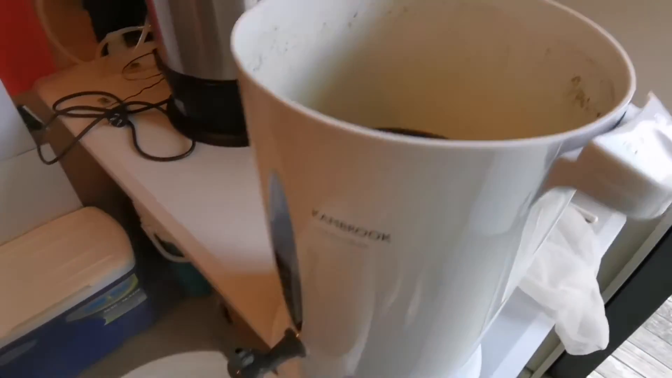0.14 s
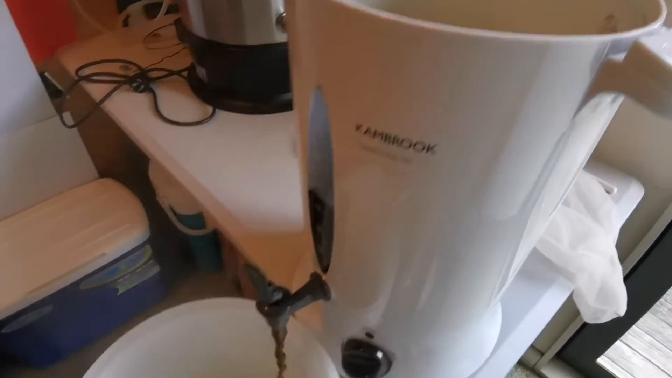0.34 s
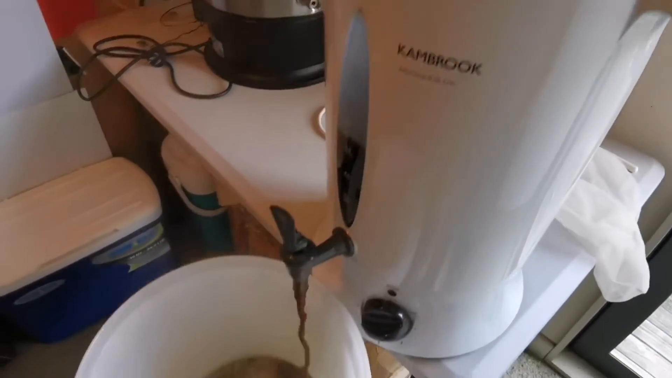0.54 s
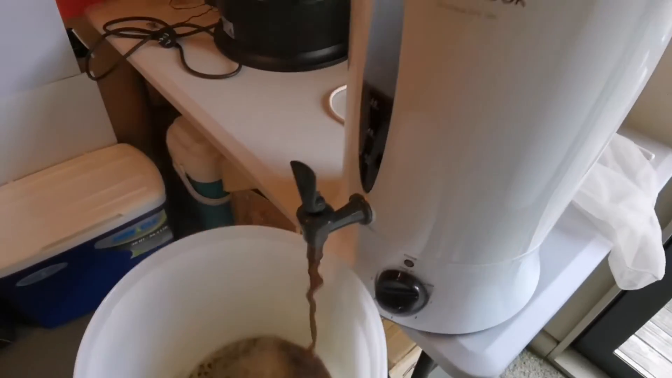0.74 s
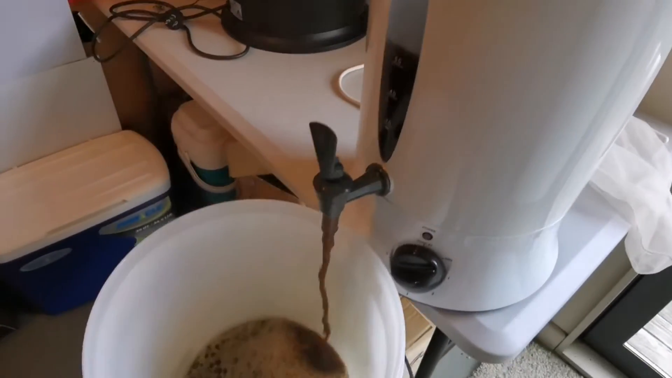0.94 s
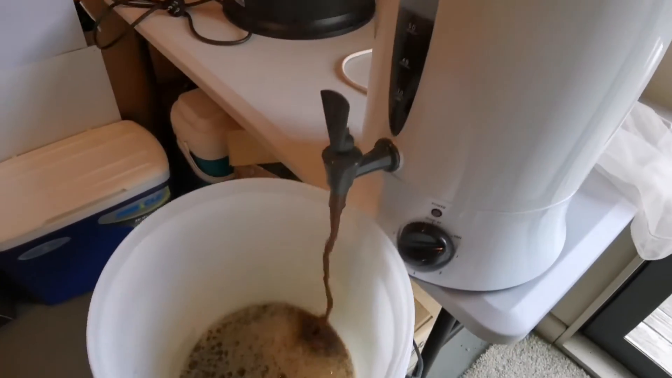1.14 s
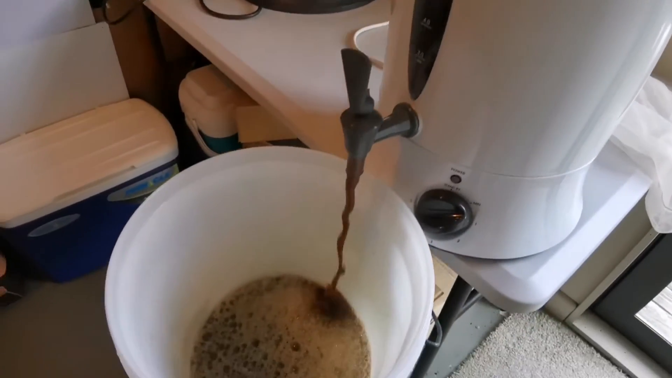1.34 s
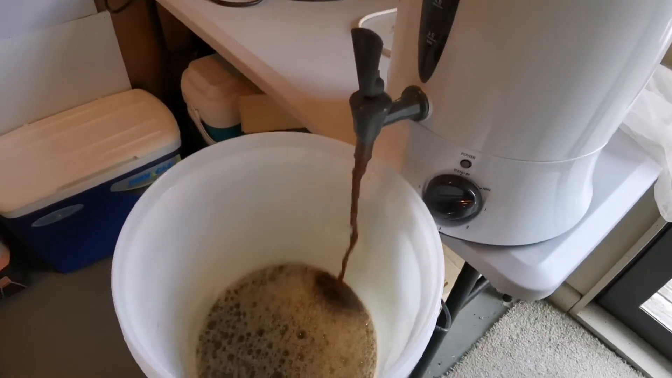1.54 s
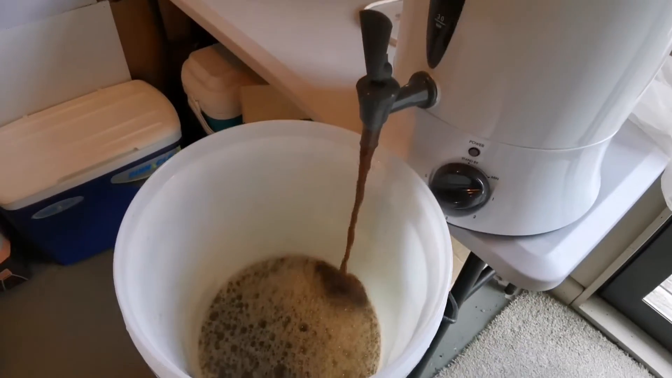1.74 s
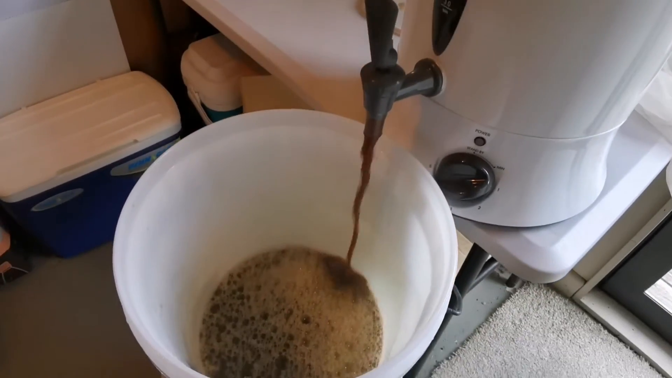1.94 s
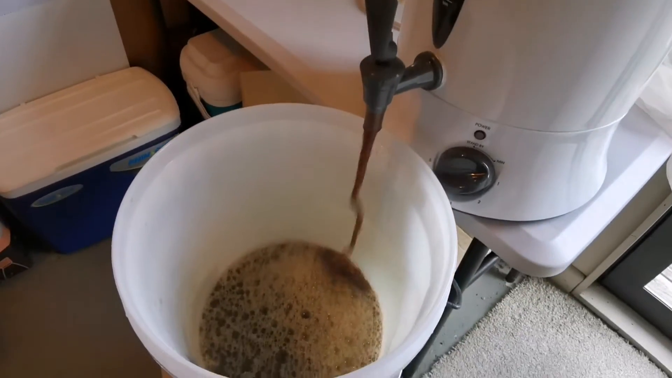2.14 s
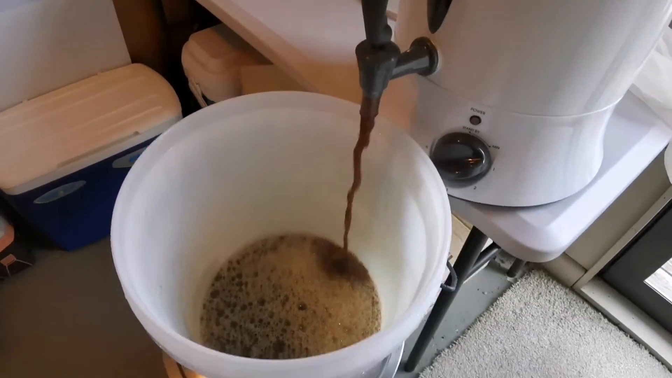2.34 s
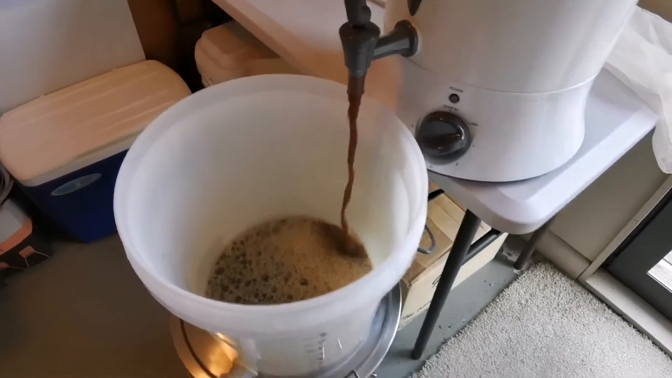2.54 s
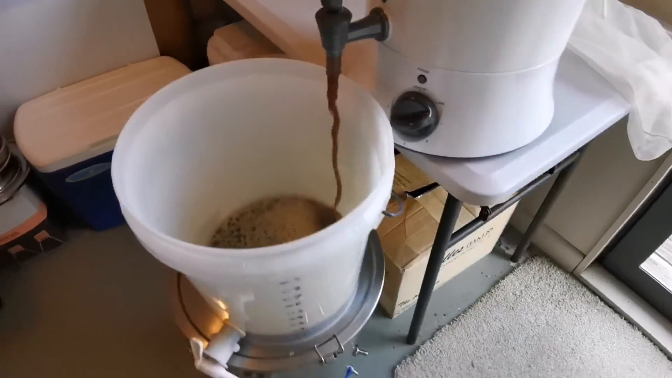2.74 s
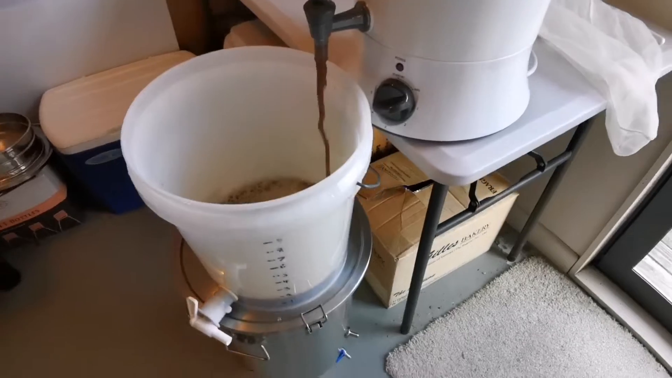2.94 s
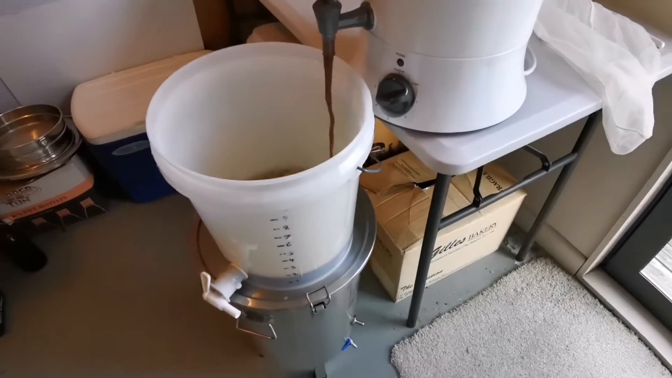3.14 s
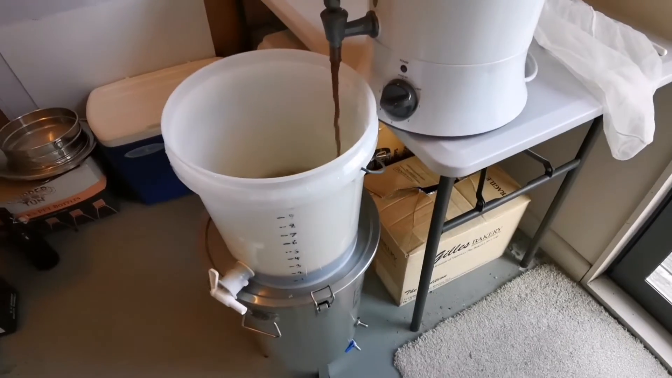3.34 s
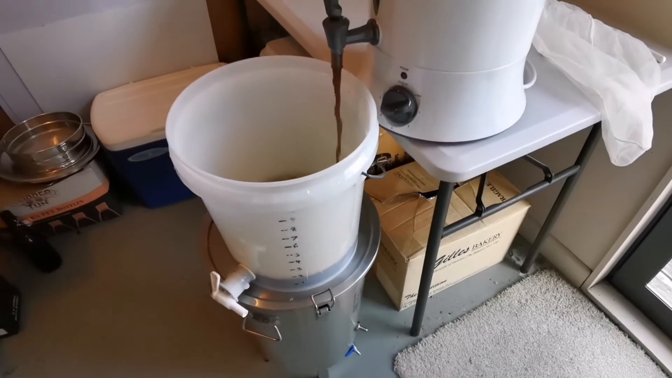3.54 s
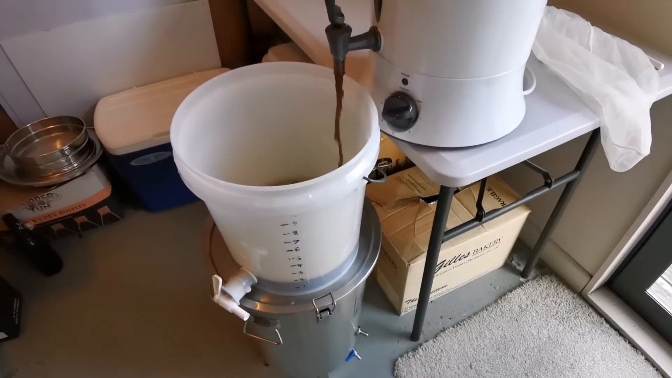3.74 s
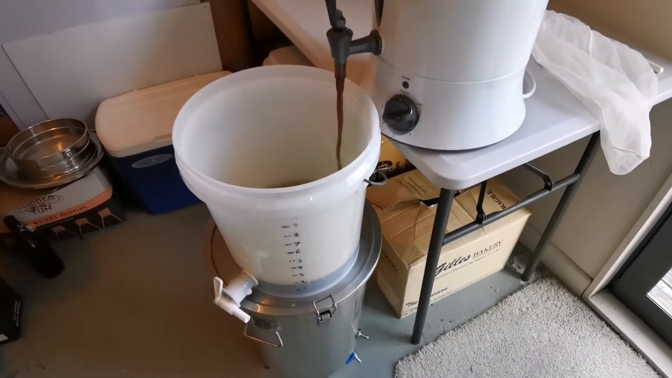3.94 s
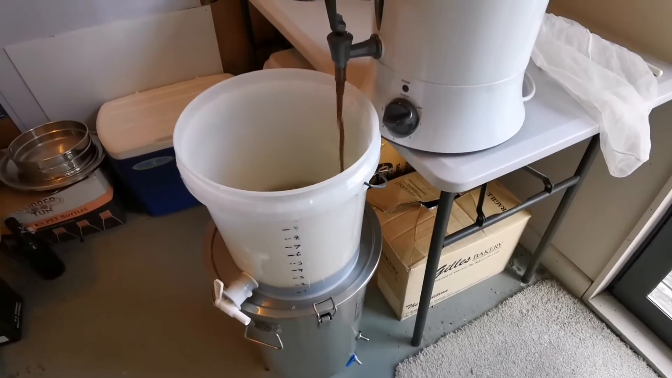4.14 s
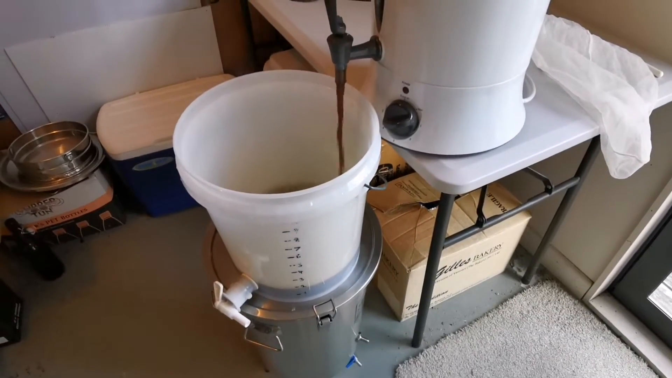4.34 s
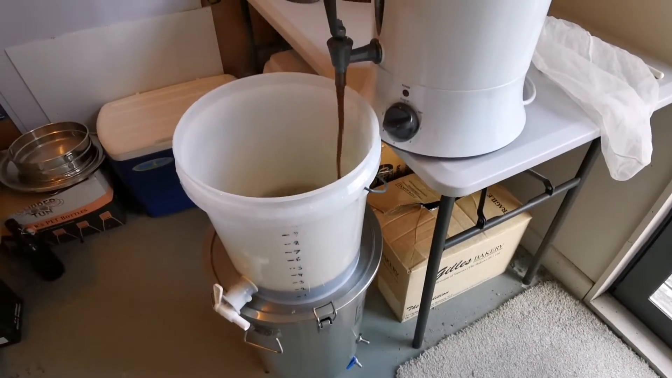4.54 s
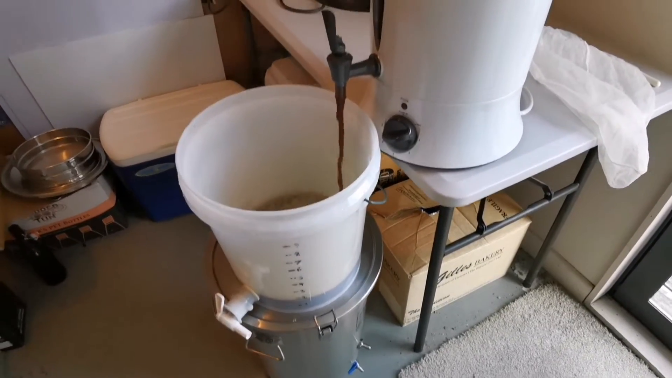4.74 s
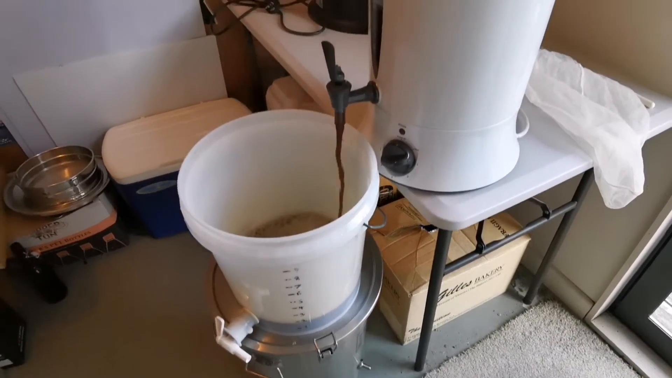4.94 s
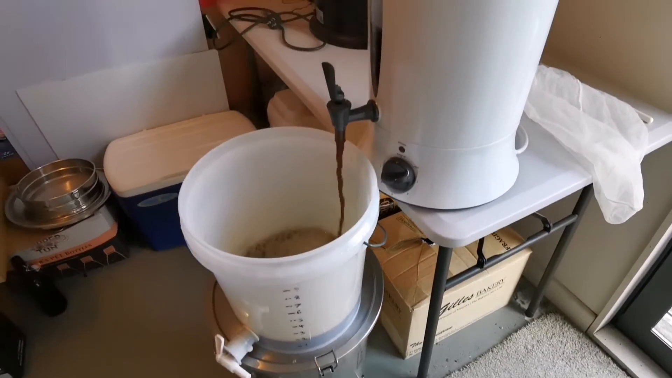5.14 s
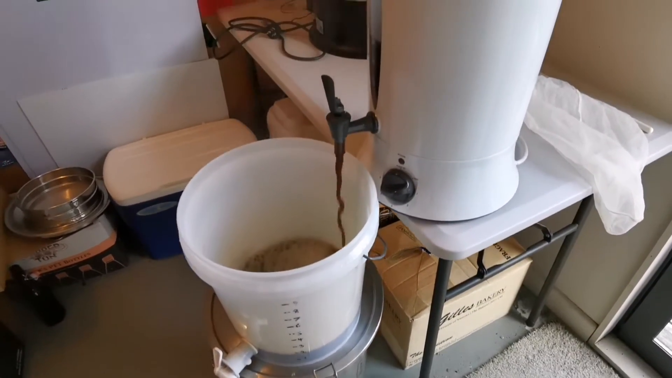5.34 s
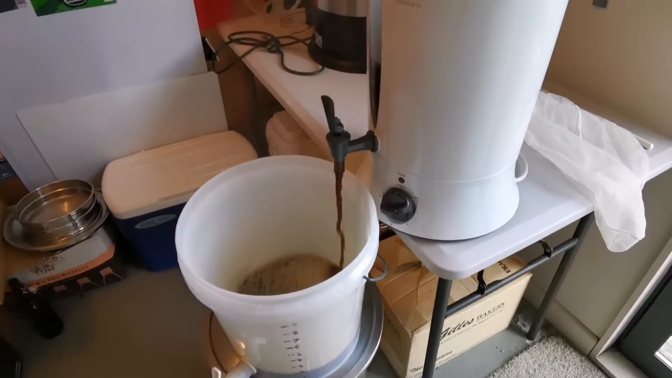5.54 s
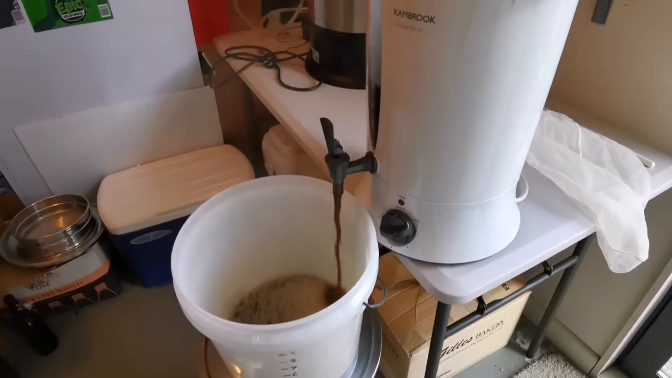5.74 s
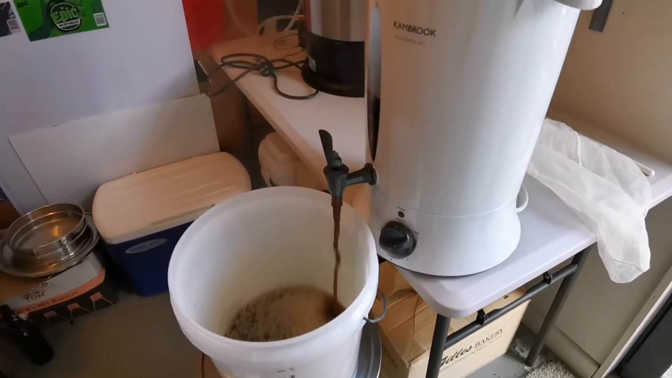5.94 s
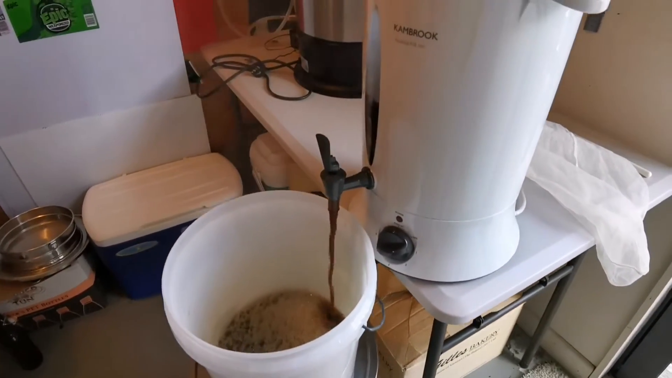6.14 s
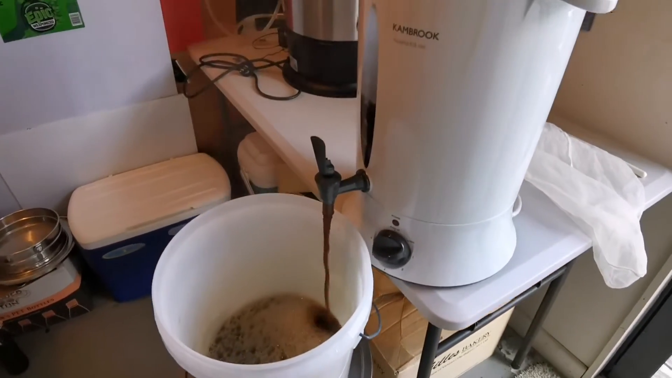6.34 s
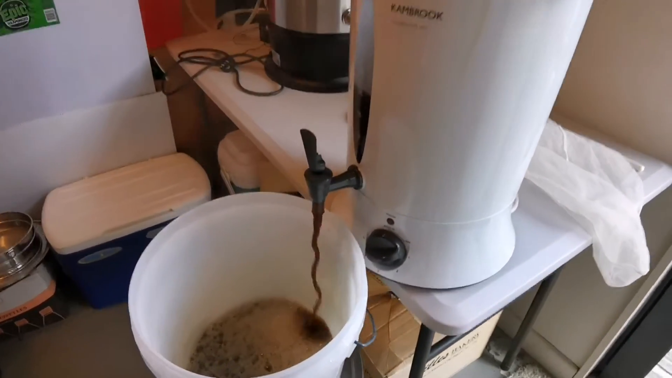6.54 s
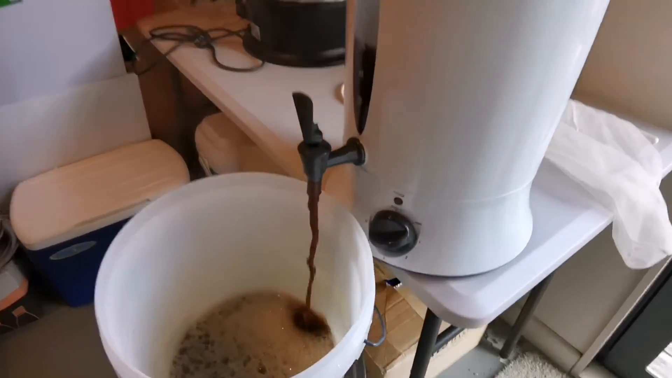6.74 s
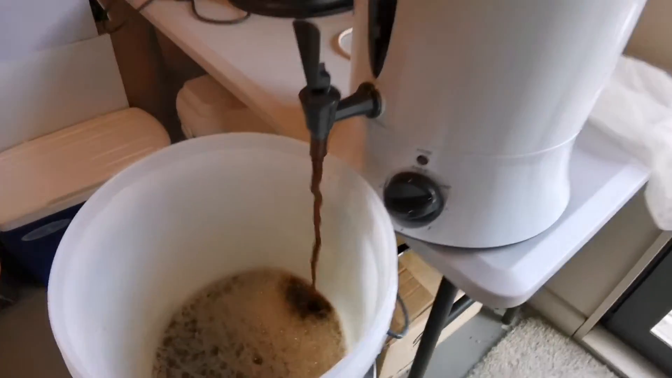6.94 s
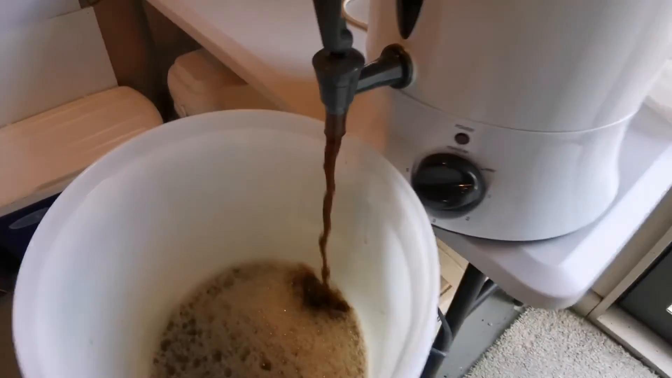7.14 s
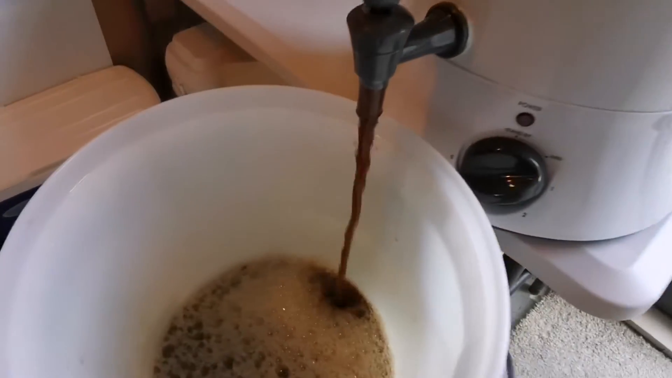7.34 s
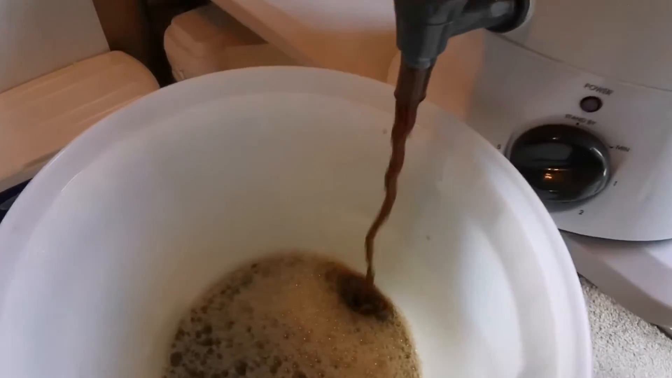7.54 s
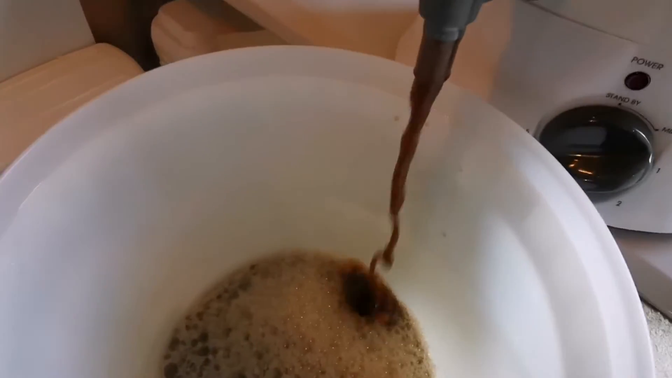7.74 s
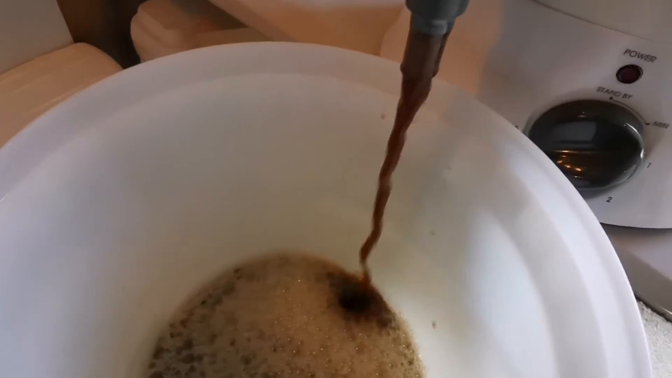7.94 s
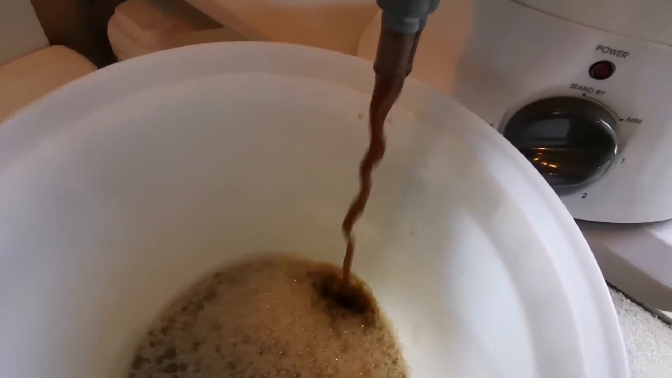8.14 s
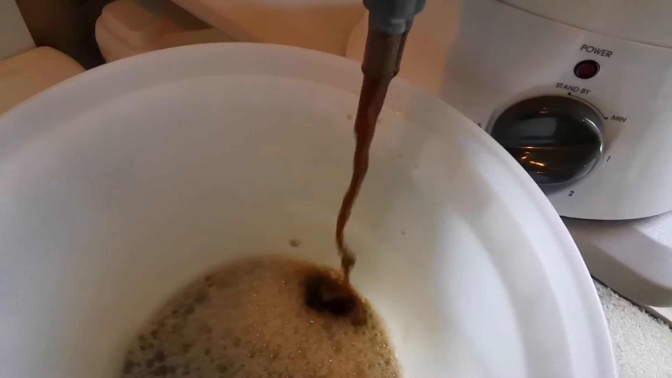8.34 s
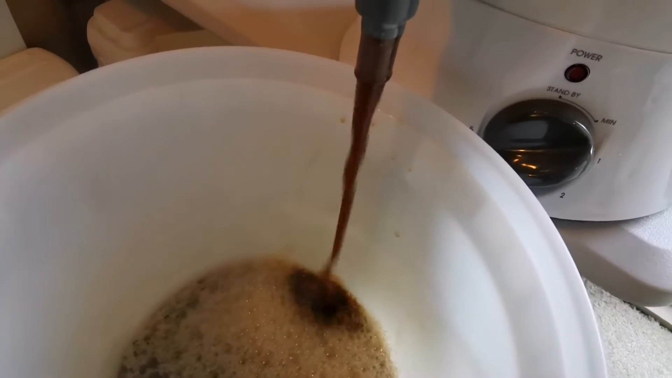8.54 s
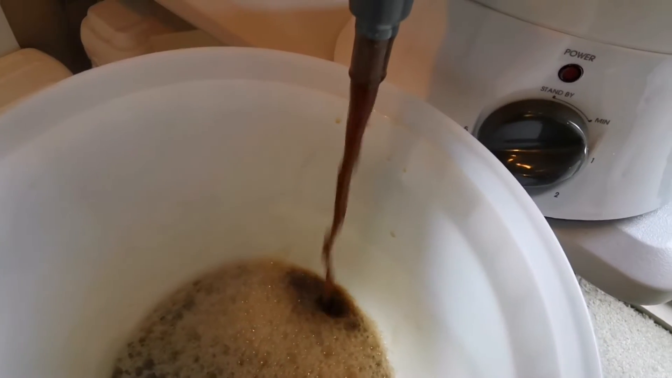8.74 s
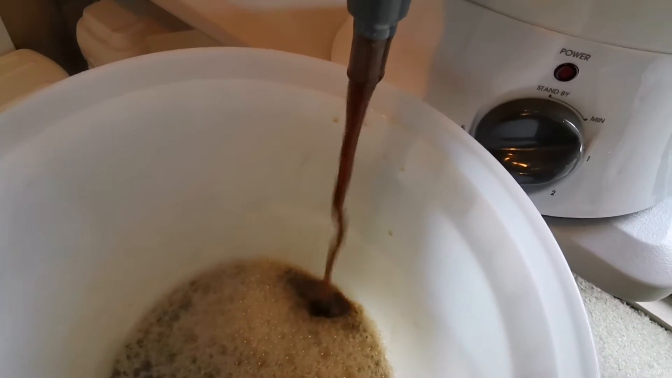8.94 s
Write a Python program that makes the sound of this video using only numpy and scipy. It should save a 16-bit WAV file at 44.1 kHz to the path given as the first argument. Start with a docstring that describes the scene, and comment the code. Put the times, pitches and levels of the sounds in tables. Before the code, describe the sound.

A thin stream from a tap patters without stopping into a foamy plastic bucket, heard by a close handheld stereo microphone in a small room. At 0 s it is faint and strongly left, with small plops and ticks from about 0.3 s. By 2 s it is centred and brighter, with crisp irregular splats and fizzing bubbles, strongest around 2.4-3 s. From 3.3 s the spray drops away, leaving softer, deeper bubbling and hollow plops, with isolated sharp splats near 4.5 and 5.8 s. A faint low hum peaks around 4.8 s. After 6.4 s the stream rises again; from 7 s it is loud, close and wet. Between 7.6 and 8.7 s, dense splats mix with resonant bucket thumps and rising gulps, the largest near 8.4-8.5 s. The pouring continues to the abrupt end near 9 s, over soft hiss and growing low rumble.

```python
"""A thin, broken stream patters and gulps into a foamy plastic bucket, over a low rumble and a faint hum.
Indoors, close to a hand-held camera with two microphones, which swings to face the stream and leans over the rim.
The stream from the tap breaks into slugs: noise bursts and swarms of short bubbles make the spray and ticks,
longer gliding bubbles are trapped air, and each plunge rings decaying modes of the bucket.
Sparse echoes give the bucket walls and the room; shaped noise gives the hiss, rumble and hum."""
import sys
import numpy as np
from scipy import signal
from scipy.fft import rfft, irfft, next_fast_len
from scipy.io import wavfile
from scipy.ndimage import uniform_filter1d

SR = 44100
rng = np.random.default_rng(int(sys.argv[2]) if len(sys.argv) > 2 else 0)


def transcribe(u):
    """Save the signal u as a 16-bit wav file named by the first command-line argument.

    u: samples, shape (n,) or (channels, n), limited to [-1, 1]; the rate is SR.
    q: integer samples, one column per channel.
    """
    v = np.clip(np.atleast_2d(u).T, -1, 1)
    q = np.round(v * 32767).astype(np.int16)
    wavfile.write(sys.argv[1], SR, q)


N = 399987

# the stream throughout: (time [s], spray level setting [dB], depth: plunging relative to the spray [dB])
FLOW = [(0, -55.5, 0), (0.6, -54, 2), (1.2, -50.5, -1), (1.42, -51, -22), (1.6, -53.5, 3), (2.4, -48.5, 4),
        (3.1, -49.5, -3), (3.4, -58.5, 8), (4.2, -53, 7.5), (5.6, -55.5, 6), (6.3, -54.5, 1.5),
        (6.6, -51, 6), (7, -45.5, 0), (7.8, -48.5, 2.5), (8.2, -45.5, 3), (9.07, -46, 4.5)]
# sharp splats of spray: (time [s], peak before the echo mix [dB], pitch [Hz])
SPLATS = [(0.453, -30.5, 3600), (0.517, -24, 3350), (0.5694, -27, 6400), (0.671, -26, 6550),
          (0.6842, -29, 7200), (0.708, -26, 7400), (0.9956, -22, 7040), (1.1203, -26, 4170),
          (1.1687, -22, 5670), (1.381, -20, 5100), (1.457, -31, 7650), (1.5975, -23.5, 3720),
          (2.048, -21, 4100), (2.1208, -24.5, 3890), (2.319, -22.5, 4020), (2.3537, -21.5, 4160),
          (2.478, -21.5, 7400), (2.5567, -25, 4000), (2.5936, -23, 3700), (2.656, -22.5, 7140),
          (3.2395, -27, 7560), (4.459, -19, 3840), (4.719, -26, 7200), (4.8782, -27.5, 4460),
          (5.258, -24, 8800), (5.7021, -24, 6900), (5.7714, -19, 7460), (6.137, -31, 6700),
          (6.1773, -25, 5400), (6.294, -27.5, 3960), (6.489, -22, 2840), (6.972, -34, 3910),
          (7.1682, -18, 7640), (7.3303, -20.5, 4730), (7.441, -22.5, 4070), (7.455, -19, 4770),
          (7.599, -20, 3960), (7.6892, -18, 4330), (7.848, -19, 4070), (7.9418, -15, 4160),
          (8.0066, -18, 3830), (8.0676, -17.5, 3800), (8.1172, -17, 3860), (8.1892, -16, 5500),
          (8.217, -29, 3700), (8.2525, -20.5, 3700), (8.2628, -18.5, 3750), (8.3082, -22.5, 7300),
          (8.364, -25, 3870), (8.425, -20.5, 4500), (8.4737, -20.5, 4800), (8.584, -14, 4000),
          (8.65, -14.5, 7300), (8.9237, -20, 4270), (8.961, -21, 3180), (8.9997, -23.5, 7600),
          (9.0486, -30, 7300)]
# slugs that plunge deep and ring the bucket: (time [s], peak before filter and echo mix [dB])
PLUNGES = [(0.389, -37.5), (0.559, -30), (0.585, -39), (0.685, -36), (1.536, -36), (1.699, -32.5),
           (2.169, -38), (2.188, -40.5), (2.354, -35), (2.52, -32), (2.949, -32.5), (3.705, -34.5),
           (4.329, -41), (4.437, -38), (4.498, -29), (4.718, -39), (4.761, -43), (5.143, -29),
           (5.651, -35.5), (5.91, -31.5), (6.137, -37), (6.477, -27), (6.744, -35.5), (7.083, -30),
           (7.168, -35), (7.554, -36), (7.667, -25), (7.948, -26), (8.045, -24.5), (8.087, -23.5),
           (8.153, -27), (8.219, -30), (8.364, -19.5), (8.455, -24), (8.557, -28), (8.584, -30),
           (8.649, -30.5), (8.766, -25.5), (8.866, -26.5), (8.971, -31.5)]
# large pockets of trapped air: (time [s], peak before flutter and echo mix [dB], pitch [Hz], decay [cycles])
GULPS = [(0.292, -35.5, 880, 2.5), (1.598, -29.5, 1027, 4.9), (2.122, -33, 910, 3.1),
         (5.8975, -32, 1055, 3.5), (6.487, -30, 930, 1.3), (7.041, -33, 1510, 10), (7.553, -29, 942, 2.1),
         (7.834, -25, 1850, 3.4), (7.947, -26.5, 1710, 6.7), (8.252, -27, 1710, 2.4),
         (8.527, -18.5, 934, 2.1)]
# air column and wall of the bucket: (frequency [Hz], relative level [dB], 60 dB decay time [s])
BUCKET_MODES = [(297.8, 24, 0.061), (408.6, 5.5, 0.12), (620, 8, 0.04), (942, 9, 0.027), (1710, 7, 0.011)]
# colour of the spray through bucket and microphone: (frequency [Hz], relative gain [dB])
SPRAY_COLOUR = [(260, -5), (450, 0), (710, -5.5), (940, -1.5), (1440, -8.5), (1720, -8), (2560, -4),
                (3290, -6.5), (3810, -1), (4480, -8), (6280, -6), (7720, 3), (10800, -17), (15200, -36)]
# level of the fine mist relative to the spray: (time [s], level setting [dB])
MIST = [(0, -6), (0.8, 0.5), (2.8, -1.5), (3.3, 2.5), (4.3, -4), (5.3, 3.5), (7, 1), (7.8, -3.5),
        (9.07, -5)]
# the camera swings to face the stream: (time [s], left minus right [dB])
PAN = [(0.0, 18), (0.7, 8.5), (2.1, -1), (6.1, 0), (9.07, 2)]
# depth of the hollow, growing as the camera leans over the rim: (time [s], share removed [0-1])
HOLLOW = [(6.3, 0.34), (7.4, 0.59)]
# colour of the foam and room hiss: (frequency [Hz], relative gain [dB])
HISS_COLOUR = [(41, -54), (70, -7.5), (176, -25.5), (1190, -12), (3680, -14.5), (4610, -23), (7740, -22.5),
               (10800, -37), (15200, -44)]
# the rumble before its left-right offset: (time [s], level [dB])
RUMBLE = [(0, -58), (0.6, -61), (2.05, -47.5), (2.3, -55), (3.7, -47), (4.3, -53.5), (6.3, -56), (7.1, -50),
          (7.8, -48), (9.07, -43)]

BUBBLING_DB, BUBBLING_PER_DEPTH = 0, 0.68  # mid-sized bubbles follow the depth [dB per dB]
SPRAY_LAG_S = 0.000055  # the right microphone hears the spray later
HOLLOW_HZ, EDGE_HZ = 2465, 16400
HISS_DB = -52.5  # before it follows the flow
RUMBLE_HZ = 47.7
HUM_HZ, HUM_DB, HUM_PEAK_S, HUM_FADE_DB_PER_S = 134.2, -63.5, 4.8, 4.5


def spray():
    """Bubble swarms bunch as the falling stream breaks into slugs; droplet ticks are returned apart."""
    slugs = swells(drops(per_s=49, spread_db=53.0, cap=0.59), fade_s=0.0072)
    bright = 0.65 * slugs + 0.18 * spatter(SPLATS, fade_s=0.0093)
    deep = 0.59 * slugs + 0.65 * spatter(PLUNGES + GULPS, fade_s=0.034)
    level_db, depth_db = column(FLOW, index=1), column(FLOW, index=2)
    mist_db = column(MIST, index=1)

    mist = fizz(5520, 13000, per_s=2800, cycles=3.2, spread_db=3.0, shared=bright)
    mist += gain_of(-18.0) * crackle(bright)
    body = fizz(2860, 5970, per_s=4000, cycles=2.35, spread_db=6.5, shared=bright)
    bubbling = fizz(387, 2340, per_s=2000, cycles=1.9, spread_db=3.0, shared=deep)

    wash = gain_of(4.5) * body + gain_of(mist_db) * mist
    wash += gain_of(BUBBLING_DB + BUBBLING_PER_DEPTH * depth_db) * bubbling
    smacks = gain_of(level_db + mist_db - 4.0) * ticks(bright)
    return gain_of(level_db) * wash, smacks


def splats():
    """Each splat is a wide noise crack with a ragged cluster of short ringing bubbles inside."""
    out, t = np.zeros(N), np.arange(2000) / SR
    cracks, pops = rng.standard_normal((2, len(SPLATS), 2000))
    cracks = cracks * (1 - np.exp(-t / 0.00073)) * np.exp(-t / 0.0016)
    impulse = np.zeros(N)
    impulse[128] = 1
    colour = coloured(impulse, SPRAY_COLOUR)[None, :257]
    cracks = signal.oaconvolve(cracks, colour, axes=1)[:, 128:2128]  # without the filter's delay
    pops = pops ** 3 * np.sqrt(t) * np.exp(-t / 0.0007)  # cubing leaves a few strong pops
    for (s, db, hz), crack, pop in zip(SPLATS, cracks, pops):
        cluster = signal.oaconvolve(pop, bubble(hz, cycles=1.96, glide=0.0027, rise=0.46))[:2000]
        splat = 0.61 * crack / abs(crack).max() + 0.98 * cluster / abs(cluster).max()
        add(out, s, gain_of(db) * splat)
    return out


def ticks(shared):
    """Single droplets smack the surface: noise cracks well under a millisecond, without bass."""
    t, out = np.arange(128) / SR, np.zeros(N)
    for crack in rng.standard_normal((8, 128)) * np.exp(-t / 0.0001):
        hits = (0.12 + shared) * drops(per_s=24, spread_db=17.0, cap=0.78)
        out += signal.oaconvolve(hits, np.diff(crack))[:N]  # differencing removes the bass
    return evened(coloured(out, SPRAY_COLOUR))


def fizz(low_hz, high_hz, per_s, cycles, spread_db, shared):
    """Many small bubbles of one size range ring, bunched in shared gushes and in their own."""
    own = swells(drops(per_s=83, spread_db=3.5, cap=0.69), fade_s=0.0082)
    size = (0.087 + shared + 1.08 * own) * drops(per_s, spread_db, cap=2.28)
    kind, out = rng.integers(0, 16, N), np.zeros(N)
    for k, hz in enumerate(np.geomspace(low_hz, high_hz, num=16)):
        ringing = signal.oaconvolve(size * (kind == k), bubble(hz, cycles, glide=0.00032, rise=0.24))[:N]
        out += hz * ringing  # higher bubbles weigh more
    return evened(coloured(out, SPRAY_COLOUR))


def crackle(shared):
    """The finest foam bursts in gusts of noise at the very top."""
    gusts = 1.1 * shared + 0.67 * swells(drops(per_s=7.4, spread_db=-7.0, cap=3.3), fade_s=0.021)
    top = signal.butter(3, 8800, "high", fs=SR, output="sos")
    return evened(signal.sosfilt(top, gusts * rng.standard_normal(N)))


def spatter(events, fade_s):
    """Droplets fall back for a while after each listed splash, in step with its strength."""
    clicks, flow_db = np.zeros(N), column(FLOW, index=1)
    for s, db, *_ in events:
        at = round(s * SR)
        clicks[at] = gain_of(0.7 * (db - flow_db[at]))
    return swells(clicks, fade_s)


def gulps():
    """Trapped air rings low and slides upward; most die in a few cycles, some sing on unsteadily."""
    out = np.zeros(N)
    for s, db, hz, ring_cycles in GULPS:
        add(out, s, gain_of(db) * bubble(hz, ring_cycles, glide=0.001, rise=0.56))
    flutter = evened(uniform_filter1d(rng.standard_normal(N), size=128))
    return out * (1 + 0.45 * flutter)


def bucket():
    """Every plunge, large or small, pushes the same modes; the open mouth radiates little below them."""
    small = np.zeros(N)
    for shift in np.linspace(0.95, 1.05, num=6):
        pushes = drops(per_s=16, spread_db=2.0, cap=4.0) * rng.choice([-1, 1], N)
        small += signal.oaconvolve(pushes, ring(shift))[:N]
    out = evened(small) * gain_of(column(FLOW, index=1) + column(FLOW, index=2) - 2.0)
    for s, db in PLUNGES:
        add(out, s, gain_of(db) * ring(1 + 0.02 * rng.standard_normal()))
    return signal.sosfilt(signal.butter(3, 190, "high", fs=SR, output="sos"), out)


def ring(shift):
    """The modes die away after one push; the crater in the liquid shifts them a little each time."""
    t, modes = np.arange(8000) / SR, 0
    for hz, db, t60 in BUCKET_MODES:
        modes = modes + gain_of(db - 60 * t / t60) * np.sin(2 * np.pi * hz * shift * t)
    modes = modes * (1 - np.exp(-t / 0.0014))  # soft start
    return modes / abs(modes).max()


def bubble(hz, cycles, glide, rise):
    """A few dying cycles slide upward as the air nears the surface; peak 1, times counted in cycles."""
    u = hz * np.arange(3000) / SR
    wave = (1 - np.exp(-u / rise)) * np.exp(-u / cycles) * np.sin(2 * np.pi * u * (1 + glide * u))
    return wave / abs(wave).max()


def drops(per_s, spread_db, cap):
    """Clicks fall at random moments with random sizes, limited by the cap."""
    size = gain_of(spread_db * np.minimum(rng.exponential(1, N), cap))
    return size * (rng.random(N) < per_s / SR)


def swells(clicks, fade_s):
    """Each click becomes a swell with a quick start and an exponential fade."""
    t = np.arange(6000) / SR
    swell = (1 - np.exp(-t / 0.0005)) * np.exp(-t / fade_s)
    return evened(signal.oaconvolve(clicks, swell)[:N])


def heard(x, lag_s, walls_db, room_db):
    """Direct sound reaches the left microphone first; bucket-wall echoes and a room tail join it.

    The stream wanders over the surface, so four sets of wall echoes take turns."""
    size = next_fast_len(N)
    delay = np.exp(-2j * np.pi * np.fft.rfftfreq(size, 1 / SR) * lag_s)
    late = irfft(rfft(x, size) * delay, size)[:N]

    share = uniform_filter1d(rng.standard_normal((N // 64 + 1, 4)), size=16, axis=0)
    share = np.repeat(share, 64, axis=0)[:N].T
    share /= np.linalg.norm(share, axis=0)
    walls = np.zeros((2, N))
    for weight in share:
        taps = echoes(0.0003, t60=0.0044, every=8)[:, :2000]
        walls += signal.oaconvolve((x * weight)[None], taps, axes=1)[:, :N]
    tail = signal.oaconvolve(x[None], echoes(0.0065, t60=0.11, every=20), axes=1)[:, :N]

    total = np.sqrt(1 + gain_of(walls_db) ** 2 + gain_of(room_db) ** 2)  # the paths share the energy
    return (np.array([x, late]) + gain_of(walls_db) * walls + gain_of(room_db) * tail) / total


def echoes(start_s, t60, every):
    """Sparse decaying reflections of random sign, different at each microphone; energy 1."""
    at = np.arange(round(start_s * SR), SR // 2 - every, every)
    at = at + rng.integers(0, every, (2, len(at)))
    taps = np.zeros((2, SR // 2))
    strength = rng.choice([-1., 1.], at.shape) * gain_of(-60 * at / SR / t60)
    np.put_along_axis(taps, at, strength, 1)
    return taps / np.linalg.norm(taps, axis=1, keepdims=True)


def room():
    """Hiss is unrelated at the two microphones; rumble and hum are shared, and the hum swells once."""
    t = np.arange(N) / SR
    hiss = gain_of(HISS_DB) * evened(coloured(rng.standard_normal((2, N)), HISS_COLOUR))
    hiss = hiss * gain_of(0.35 * (column(FLOW, index=1) + 48.5))  # partly follows the flow
    rumble = 0.54 * np.sin(2 * np.pi * RUMBLE_HZ * t)
    rumble += narrow_noise(RUMBLE_HZ, width_hz=4.6) + 0.51 * narrow_noise(60, width_hz=52)
    hum_db = HUM_DB - HUM_FADE_DB_PER_S * abs(t - HUM_PEAK_S)
    hum = gain_of(hum_db) * narrow_noise(HUM_HZ, width_hz=4.7)
    low = gain_of(column(RUMBLE, index=1)) * evened(rumble) + hum
    return hiss + low * gain_of([[-1.4], [1.4]])  # left, right


def narrow_noise(hz, width_hz):
    """Noise through a resonance applied twice: smoothed near zero, then moved up to hz."""
    smooth = rng.standard_normal(N) + 1j * rng.standard_normal(N)
    r = np.exp(-np.pi * width_hz / SR)
    for _ in range(2):
        smooth = signal.lfilter([1 - r], [1, -r], smooth)
    return evened((smooth * np.exp(2j * np.pi * hz * np.arange(N) / SR)).real)


def coloured(x, points):
    """Filters x by the gain curve drawn through the points, on a log frequency scale."""
    size = next_fast_len(N)
    f, db = np.transpose(points)
    bins = np.fft.rfftfreq(size, 1 / SR)
    gain = gain_of(np.interp(np.log(bins + 1), np.log(f + 1), db))
    return irfft(rfft(x, size) * gain, size)[..., :N]


def gain_of(db):
    """Amplitude ratio of a level in dB."""
    return 10 ** (np.asarray(db) / 20)


def evened(x):
    """Scales x to an RMS of 1."""
    return x / np.sqrt(np.mean(x ** 2) + 1e-20)


def column(table, index):
    """One column of a time curve, read at every sample."""
    rows = np.asarray(table)
    return np.interp(np.arange(N) / SR, rows[:, 0], rows[:, index])


def add(mix, s, sound):
    """Lays a sound into the mix from s seconds on."""
    part = mix[max(round(s * SR), 0):][:len(sound)]
    part += sound[:len(part)]


def scene():
    """The stream and the bucket before the two microphones, with the room behind."""
    side_db = column(PAN, index=1) * np.array([[0.5], [-0.5]])
    wash, smacks = spray()
    bright = heard(wash, SPRAY_LAG_S, walls_db=1.5, room_db=-5.5)
    bright += heard(smacks + splats(), SPRAY_LAG_S / 2, walls_db=-2.5, room_db=-8.0)
    deep = heard(bucket() + gulps(), lag_s=0.00014, walls_db=-29.0, room_db=-11.0)
    # the camera body shades treble more than bass
    return bright * gain_of(side_db) + deep * gain_of(0.16 * side_db) + room()


def record(dry):
    """A narrow hollow in the middle; the highest treble fades softly; then the band limit."""
    resonance = signal.lfilter(*signal.iirpeak(HOLLOW_HZ, 4.5, fs=SR), dry)
    hollowed = dry - column(HOLLOW, index=1) * resonance
    fade = signal.firwin(101, 15600, window=("kaiser", 4), fs=SR)
    soft = signal.oaconvolve(hollowed, fade[None], "same")
    edge = signal.firwin(511, EDGE_HZ, window=("kaiser", 9), fs=SR)
    return signal.oaconvolve(soft, edge[None], "same")


dry = scene()
out = record(dry)
transcribe(out)
```